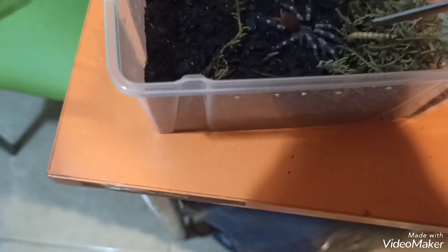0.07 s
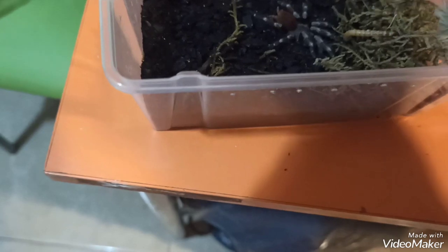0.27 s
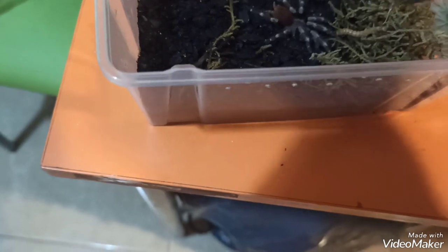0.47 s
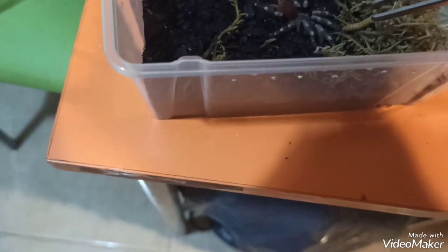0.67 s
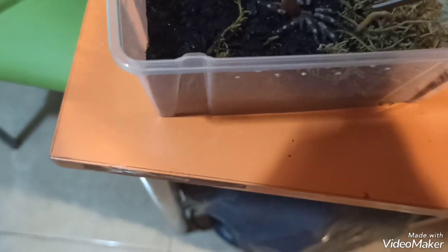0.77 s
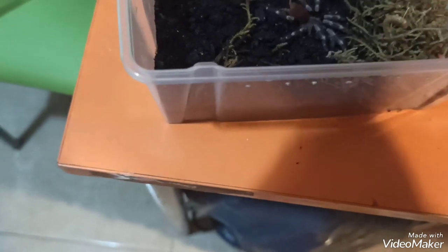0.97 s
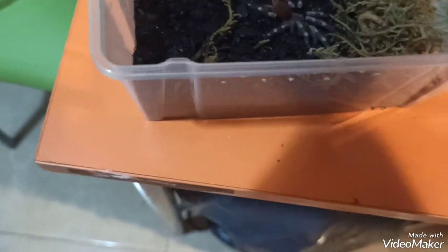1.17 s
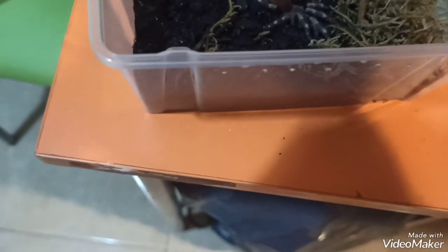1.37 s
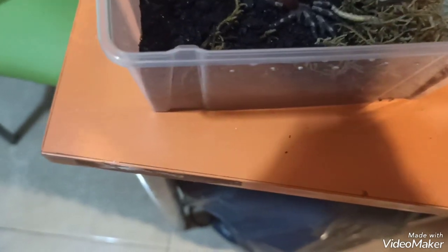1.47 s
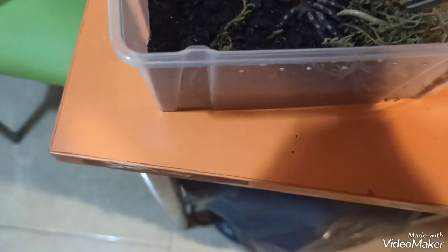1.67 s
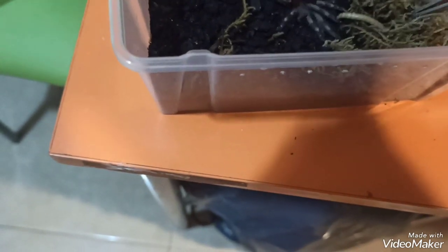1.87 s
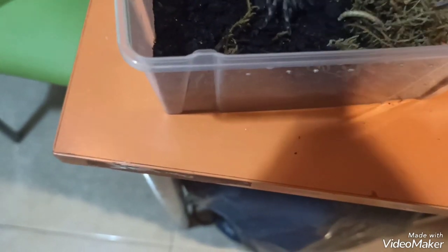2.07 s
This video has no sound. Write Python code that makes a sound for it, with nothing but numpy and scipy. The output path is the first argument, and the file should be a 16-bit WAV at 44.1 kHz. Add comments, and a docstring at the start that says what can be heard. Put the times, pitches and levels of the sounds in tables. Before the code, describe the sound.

Metal feeding tweezers rap a thin plastic tub twice, close to the microphone, right at the end; before that only steady low hum, soft hiss, one faint bump and a few tiny ticks in a hard-walled room.

```python
"""A steady hum and hiss, noise of a fixed spectrum, lasts throughout a quiet hard-walled room.
A soft bump of a thin plastic tub comes first, then a few faint ticks of metal feeding tweezers, as noise bursts.
At last the tweezers knock twice on the tub, close by: each knock is a bright chirped click of the steel tip
and a short hollow ring, a sum of decaying modes. Light rebounds of the tub follow each knock.
The room answers every blow with early reflections and a diffuse tail."""
import sys
import numpy as np
from scipy import signal
from scipy.fft import rfft, irfft, next_fast_len
from scipy.io import wavfile

SR = 44100
rng = np.random.default_rng(int(sys.argv[2]) if len(sys.argv) > 2 else 0)


def master(y):
    """Save y as 16-bit WAV."""
    cut = np.clip(np.atleast_2d(y).T, -1, 1)
    pcm = np.round(cut * 32767)  # scale
    wavfile.write(sys.argv[1], SR, pcm.astype(np.int16))


N = 93844


def amp(db):
    """Level is logarithmic: decibels become a factor of amplitude."""
    return 10 ** (np.asarray(db) / 20)


def unit(x):
    """Mean power sets the level: the sound is scaled to rms 1."""
    return x / np.sqrt(np.mean(x ** 2) + 1e-20)


def along(points, hz):
    """Pitch is logarithmic: (Hz, value) points are interpolated on a log frequency axis."""
    point_hz, values = np.transpose(points)
    return np.interp(np.log(hz + 1), np.log(point_hz + 1), values)


def bell(hz, centre_hz, octaves):
    """Resonance on a log axis: a Gaussian of frequency with the given width in octaves."""
    return np.exp(-0.5 * (np.log2(hz / centre_hz) / octaves) ** 2)


def decay(t, t60):
    """Exponential decay: the amplitude falls by 60 dB in t60 seconds."""
    return np.exp(-np.log(1000) * t / t60)


def filtered(x, response):
    """Linear filtering: the spectrum is multiplied by a response, a function of frequency."""
    size = next_fast_len(len(x) + SR // 2)
    return irfft(rfft(x, size) * response(np.fft.rfftfreq(size, 1 / SR)), size)[:len(x)]


def coloured(x, points, size=4096):
    """Minimum phase: folding the cepstrum of (Hz, dB) points gives a causal filter."""
    gain = amp(along(points, np.fft.rfftfreq(size, 1 / SR)))
    cepstrum = irfft(np.log(gain))
    cepstrum[1:size // 2] *= 2
    cepstrum[size // 2 + 1:] = 0
    impulse_response = irfft(np.exp(rfft(cepstrum)))
    return signal.fftconvolve(x, impulse_response)[:len(x)]


def high_passed(x, corner_hz):
    """Second-order high-pass: the response falls 12 dB per octave below the corner."""
    return signal.sosfilt(signal.butter(2, corner_hz, "highpass", fs=SR, output="sos"), x)


def placed(s, sound):
    """Superposition in time: a silent track with the sound starting at s seconds."""
    return np.pad(sound, (max(0, round(s * SR)), N))[:N]


def air():
    """Stationary noise: white noise shaped by a fixed spectrum is heard as steady hum and hiss."""
    # Room hum and microphone hiss. Each row: frequency in Hz, relative density in dB per Hz.
    spectrum = [(25, -0.5), (45, -29.5), (70, -3), (105, 1.5), (170, -4), (270, 0), (450, -11.5), (620, -9),
                (760, -15), (1100, -17.5), (2000, -22.5), (3200, -25), (4400, -23.5), (7000, -32.5),
                (12500, -23), (15000, -19.5)]
    level_db = -49  # rms, ahead of the microphone
    noise = filtered(rng.standard_normal(N), lambda hz: amp(along(spectrum, hz)))
    return amp(level_db) * unit(noise)


def ring(hz, db, t60, rise_s):
    """Modal vibration: one struck mode is a sine with a quick rise and an exponential decay."""
    scatter_db = 3.5  # standard deviation of a mode's level from blow to blow
    t = np.arange(SR // 4) / SR
    envelope = decay(t, t60) * (1 - np.exp(-t / rise_s))
    level = amp(db + scatter_db * rng.standard_normal())
    return level * envelope * np.sin(2 * np.pi * hz * t)


def tub(contact_ms, favoured_hz):
    """Modal superposition: the struck spot lifts nearby modes; a longer contact weakens the upper ones."""
    # Modes of the tub's wall. Each row: frequency in Hz, level in dB, t60 in seconds.
    modes = [(266, -13, 0.017), (397, -2, 0.027), (481, -16.5, 0.027), (634, -3.5, 0.026), (888, -9, 0.022),
             (977, -7.5, 0.02), (1460, 0.5, .012), (1750, -14, 0.015), (2160, -15, .011),
             (2605, -16.5, 0.015)]
    favour_db, favour_octaves = 4.5, 0.15
    rise_s = 0.00063
    radiate_hz = 189  # the small tub radiates little below this
    corner_hz = 1000 / (np.pi * contact_ms)
    wall = 0
    for hz, db, t60 in modes:
        lift_db = favour_db * bell(hz, favoured_hz, favour_octaves)
        wall = wall + ring(hz, db + lift_db, t60, rise_s) / np.hypot(1, hz / corner_hz)
    return high_passed(wall, radiate_hz)


def room(x):
    """Reverberation: dull early reflections, then a diffuse tail whose t60 depends on frequency."""
    # Early reflections. Each row: delay in seconds, level in dB.
    walls = [(0.013, -26), (0.0256, -24)]
    # Decay of the tail. Each row: frequency in Hz, t60 in seconds.
    tail_t60 = [(100, 0.86), (400, 0.56), (1000, 0.4), (3000, 0.63), (7000, 0.49), (14000, 0.48)]
    # Colour of the tail. Each row: frequency in Hz, gain in dB.
    tail_gain = [(100, -3.5), (200, -4.5), (280, -3.5), (385, -9.5), (520, -0.5), (750, -7), (1100, -2),
                 (1500, -13.5), (2100, -4.5), (3000, -3), (4000, -20), (5400, -8), (7000, -11.5),
                 (14000, -14)]
    dull_hz = 6000  # the early reflections are dull above this
    rise_s = 0.0013

    def reflections(hz):
        """Delay is a linear phase: each wall returns an attenuated later copy."""
        copies = sum(amp(db) * np.exp(-2j * np.pi * hz * s) for s, db in walls)
        return copies / (1 + 1j * hz / dull_hz)

    early = filtered(x, reflections)
    hz, t, bands = signal.stft(rng.standard_normal(SR), SR, nperseg=256)
    tail = signal.istft(bands * decay(t, along(tail_t60, hz)[:, None]), SR)[1]
    tail = tail * (1 - np.exp(-(np.arange(len(tail)) / SR / rise_s) ** 2))
    tail = coloured(tail / np.linalg.norm(tail), tail_gain)
    return early + signal.fftconvolve(x, tail)[:N]


def tick(centre_hz, size=2048):
    """Band noise with exponential decay: a tiny bright scrape of steel, scaled to unit energy."""
    width_octaves, t60 = 0.8, 0.03  # t60 in seconds
    t = np.arange(size) / SR
    noise = rng.standard_normal(size)
    grit = unit(filtered(noise, lambda hz: bell(hz + 1, centre_hz, width_octaves)))
    burst = grit * decay(t, t60)
    return burst / np.linalg.norm(burst)


def click(bright_hz, size=2048):
    """Bending-wave dispersion: the steel tip's snap spreads along the wall into a quick downward chirp."""
    # Click at the tip. Each row: frequency in Hz, level in dB.
    tip_spectrum = [(200, -12), (1200, -7.5), (2900, -20), (3500, -4.5), (4600, -2.5), (5400, -15.5),
                    (6800, -7.5), (8000, -7.5), (9800, -22), (12000, -8), (15500, -16)]
    bend_s = 0.001505  # travel time at 1 kHz; higher waves run faster
    hz = np.fft.rfftfreq(size, 1 / SR)
    # This phase delays each frequency by bend_s * sqrt(1000 / hz).
    travel = np.exp(-4j * np.pi * bend_s * np.sqrt(1000 * hz))
    softening = (1 + 1j * hz / bright_hz) ** 2
    tip = coloured(signal.unit_impulse(size), tip_spectrum)
    return irfft(rfft(tip) * travel / softening)[:size // 2]


def blows():
    """Independent excitations: bumps, ticks and knocks ahead of the room, one track for each."""
    # Soft bumps and rebounds of the tub. Each row: start in seconds, level in dB,
    # contact time in ms, pitch favoured by the struck spot in Hz.
    bumps = [(.0402, -37, 0.89, 193), (1.9153, -18, 0.34, 634), (2.004, -27.5, 0.52, 900),
             (2.029, -26.5, 0.77, 1030)]
    # Faint ticks of the tweezers alone. Each row: start in seconds, level in dB, centre in Hz.
    ticks = [(0.388, -31, 5530), (1.283, -38, 6900), (1.3344, -27, 9700)]
    # Knocks on the tub. Each row: start of the ring in seconds, tub level in dB, click level in dB,
    # contact time in ms, click brightness (corner) in Hz, pitch favoured by the struck spot in Hz.
    knocks = [(1.8928, -10, 20, 0.083, 13700, 392), (1.9539, -12.5, 14, 0.063, 3850, 904)]
    touch_lead_s = 0.0009  # the tip touches before the wall gives way
    for s, db, contact_ms, favoured_hz in bumps:
        yield placed(s, amp(db) * tub(contact_ms, favoured_hz))
    for s, db, centre_hz in ticks:
        yield placed(s, amp(db) * tick(centre_hz))
    for s, tub_db, click_db, contact_ms, bright_hz, favoured_hz in knocks:
        tip = placed(s - touch_lead_s, amp(click_db) * click(bright_hz))
        wall = placed(s, amp(tub_db) * tub(contact_ms, favoured_hz))
        yield tip + wall


def scene():
    """Superposition: steady air plus every blow, each raising its own reverberant tail."""
    struck = sum(blow + room(blow) for blow in blows())
    return (air() + struck)[None]


def record(dry):
    """Transduction: microphone colour and low cut, then soft saturation of peaks and a band limit."""
    # Microphone colour, with two troughs in the treble. Each row: frequency in Hz, gain in dB.
    colour = [(4700, 2), (4950, -5), (5900, -1.5), (6300, 8.5), (7600, 5.5), (7900, -3), (8400, -3.5),
              (8800, -11), (11400, -17), (11700, -5)]
    low_cut_hz, top_hz = 67.5, 15900
    clip_top = 0.85  # amplitude that the rounded peaks approach
    x = high_passed(coloured(dry[0], colour), low_cut_hz)
    x = x / (1 + (x / clip_top) ** 6) ** (1 / 6)
    return filtered(x, lambda hz: 1 / np.hypot(1, (hz / top_hz) ** 120))[None]


dry = scene()
out = record(dry)
master(out)
```